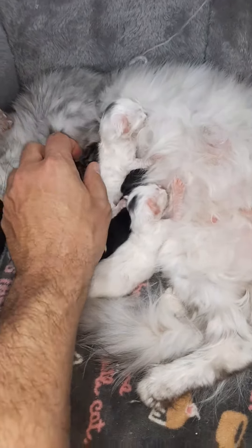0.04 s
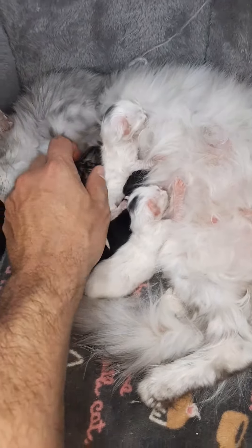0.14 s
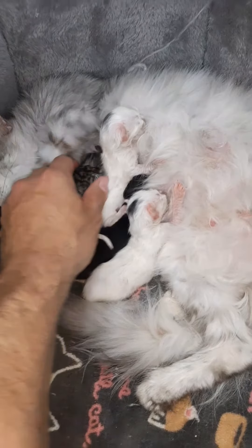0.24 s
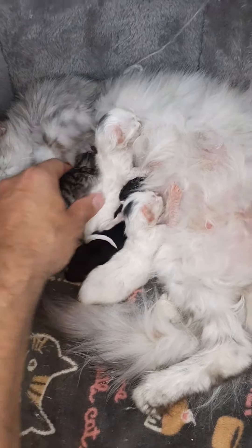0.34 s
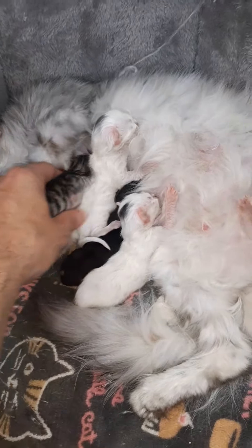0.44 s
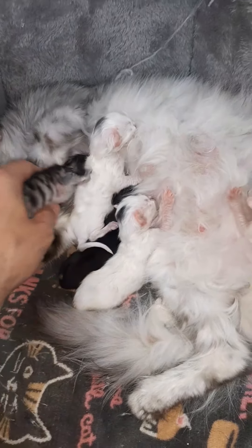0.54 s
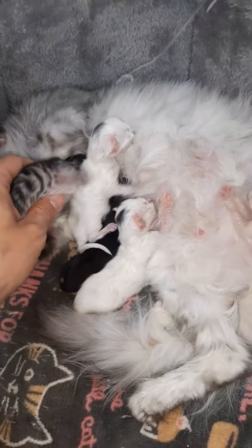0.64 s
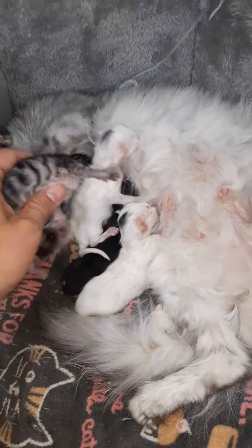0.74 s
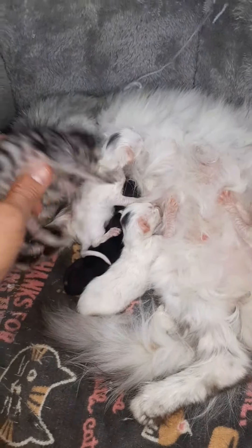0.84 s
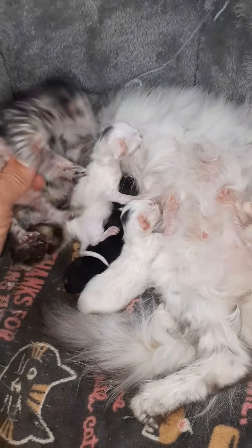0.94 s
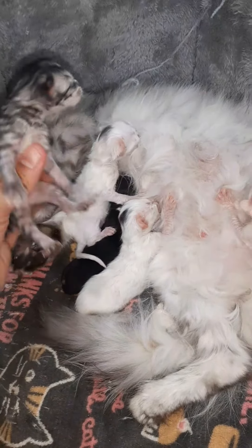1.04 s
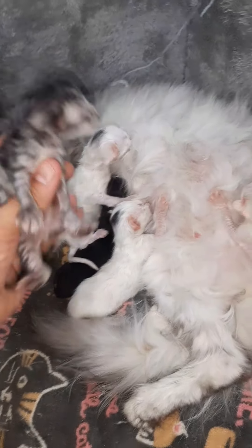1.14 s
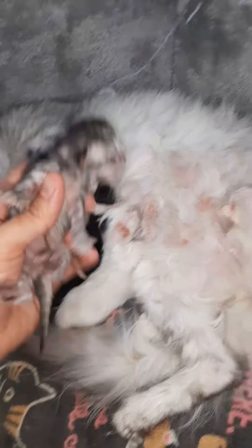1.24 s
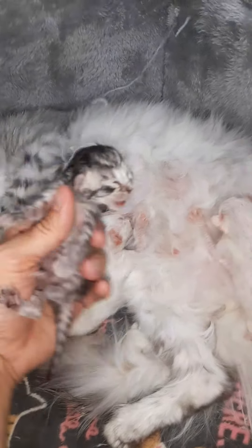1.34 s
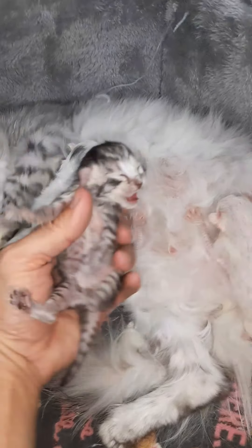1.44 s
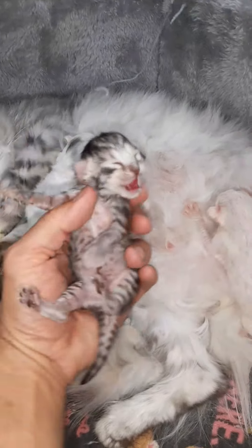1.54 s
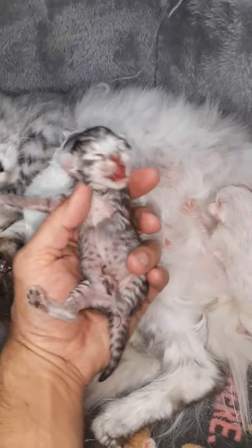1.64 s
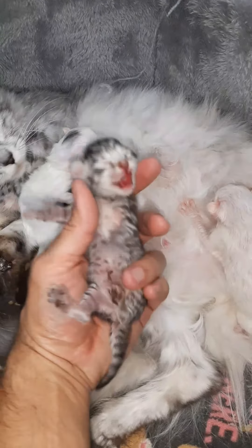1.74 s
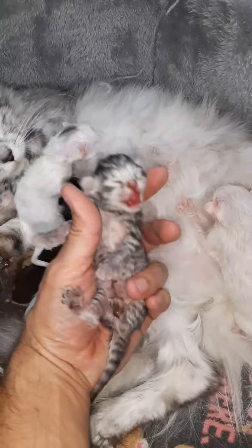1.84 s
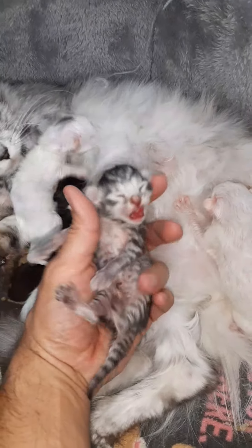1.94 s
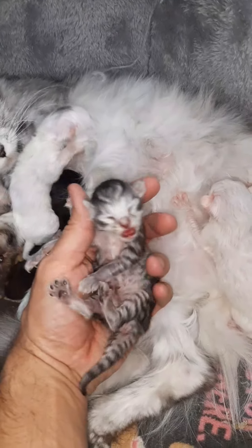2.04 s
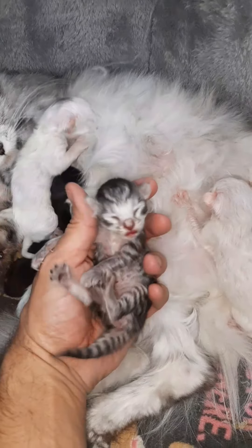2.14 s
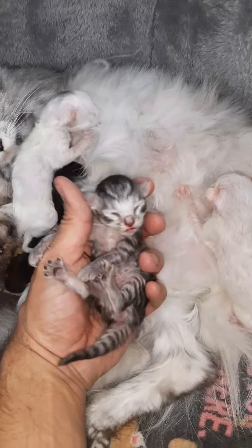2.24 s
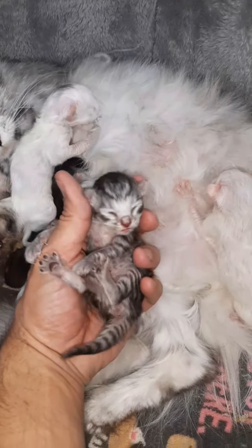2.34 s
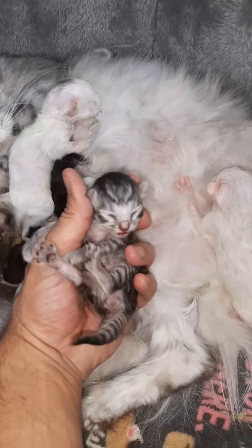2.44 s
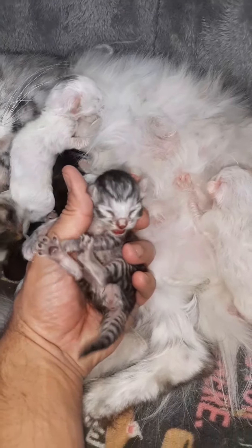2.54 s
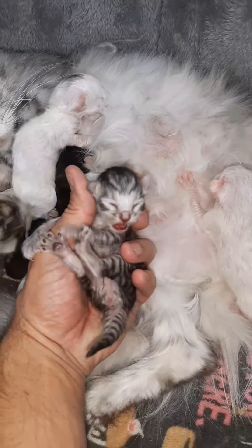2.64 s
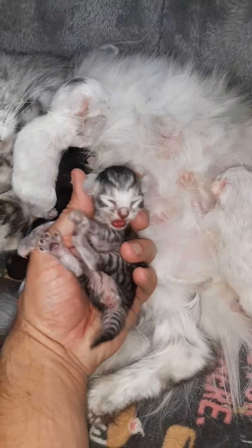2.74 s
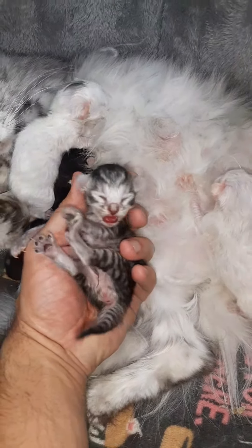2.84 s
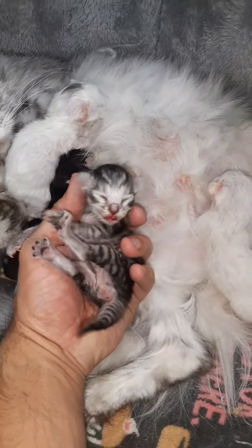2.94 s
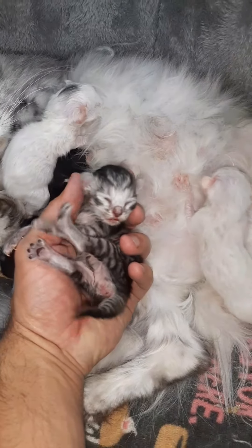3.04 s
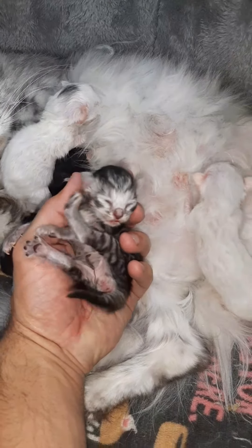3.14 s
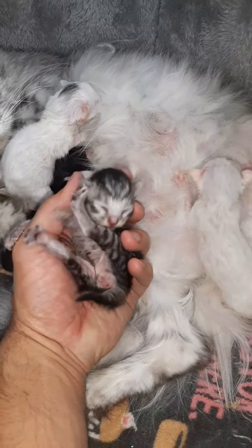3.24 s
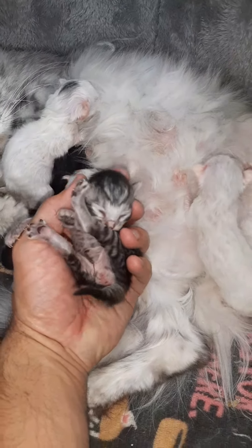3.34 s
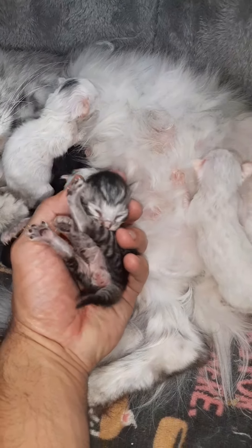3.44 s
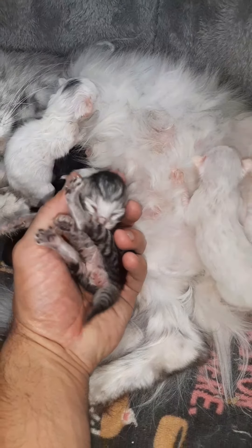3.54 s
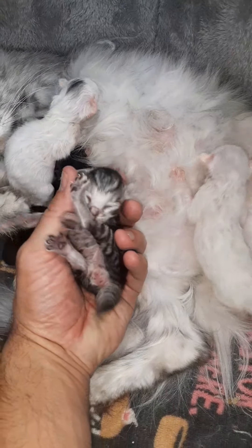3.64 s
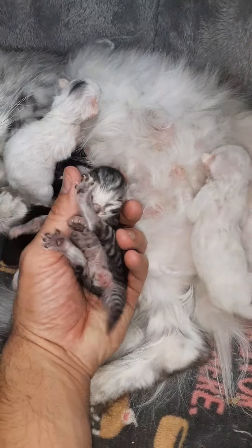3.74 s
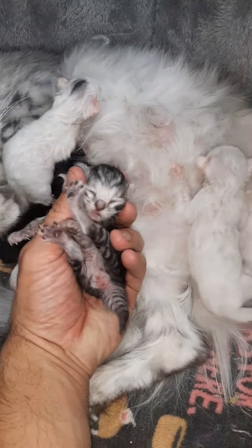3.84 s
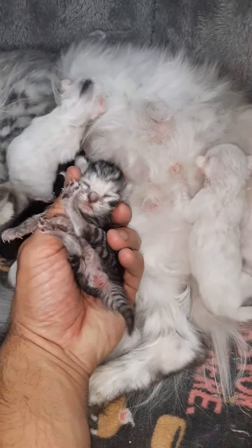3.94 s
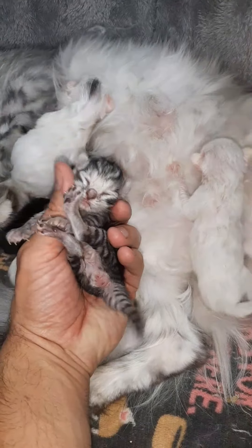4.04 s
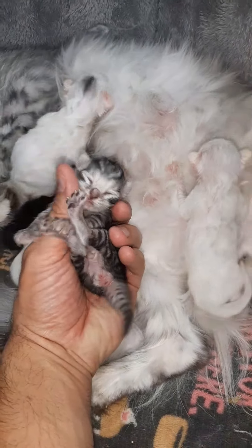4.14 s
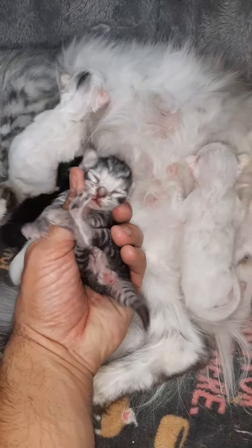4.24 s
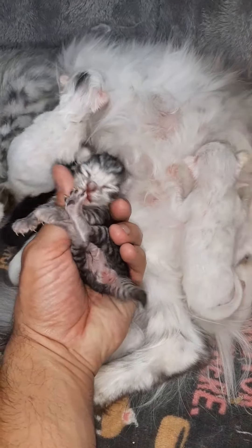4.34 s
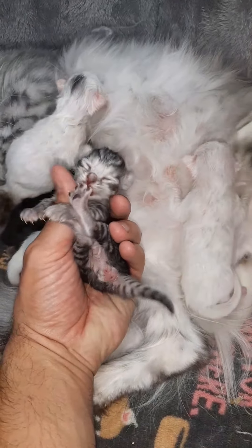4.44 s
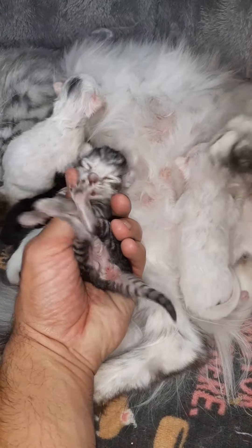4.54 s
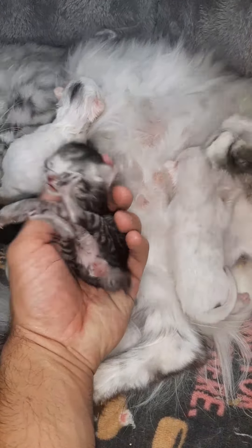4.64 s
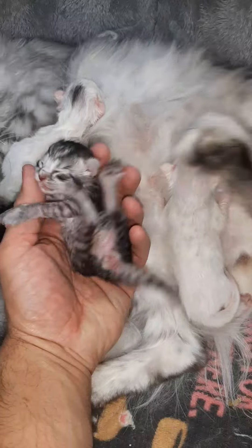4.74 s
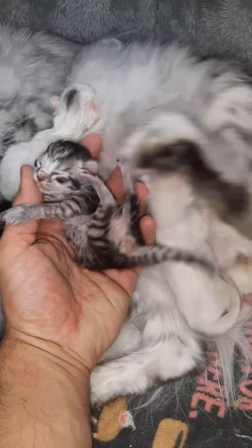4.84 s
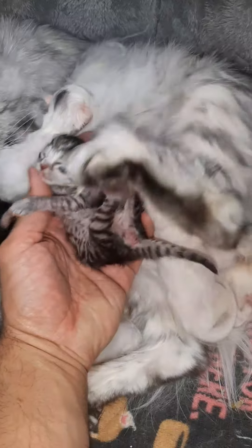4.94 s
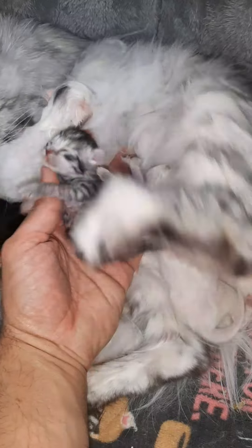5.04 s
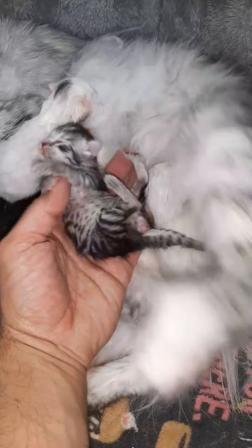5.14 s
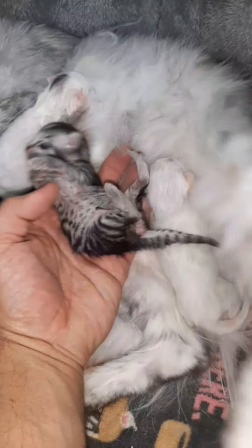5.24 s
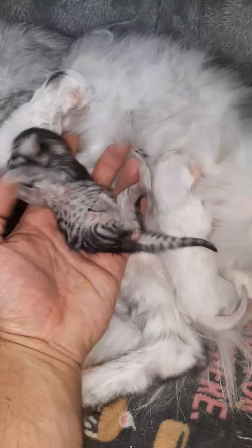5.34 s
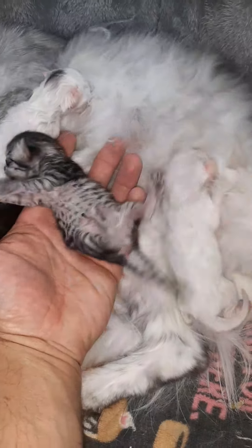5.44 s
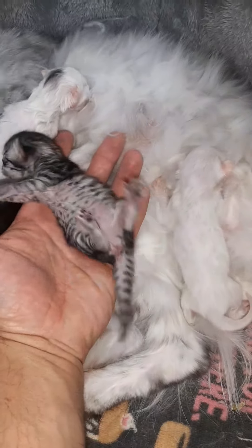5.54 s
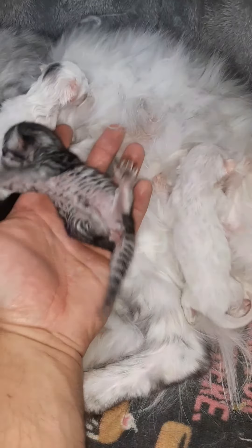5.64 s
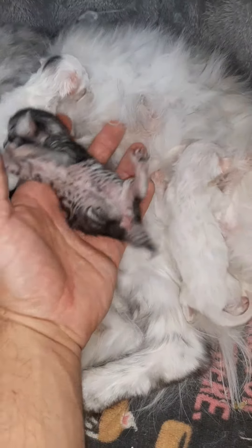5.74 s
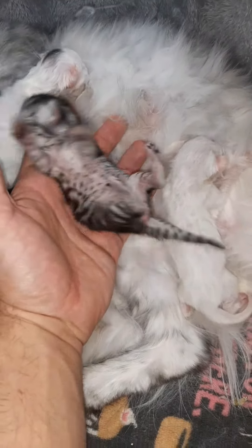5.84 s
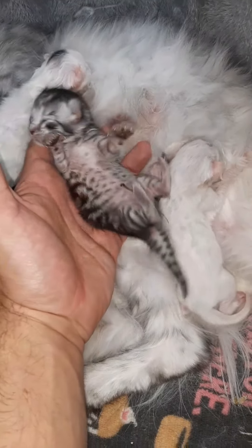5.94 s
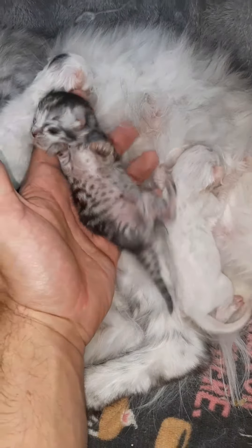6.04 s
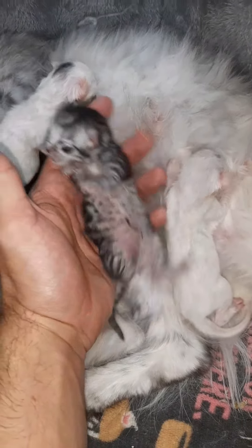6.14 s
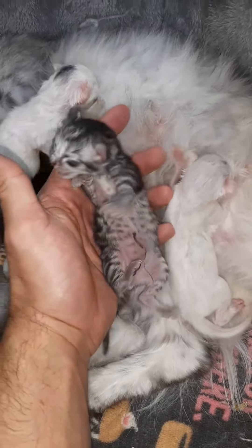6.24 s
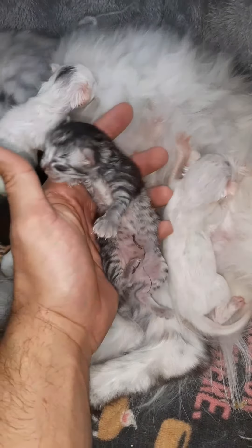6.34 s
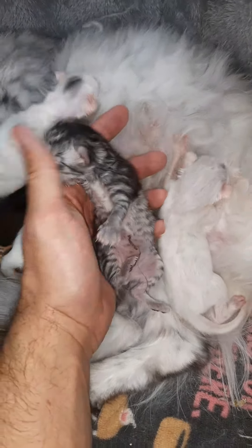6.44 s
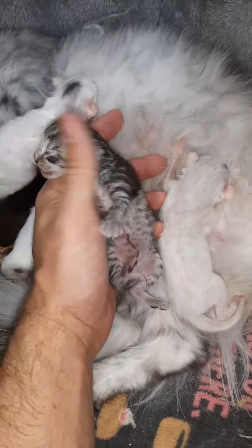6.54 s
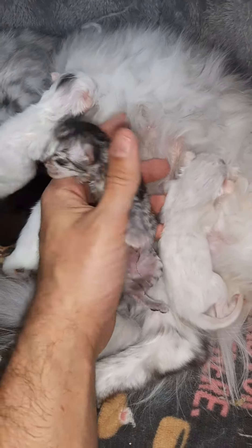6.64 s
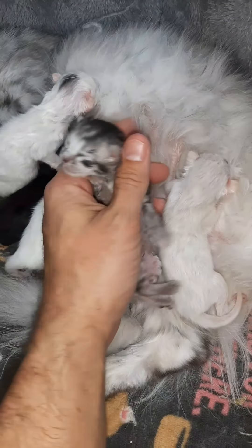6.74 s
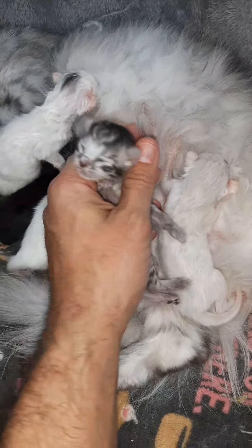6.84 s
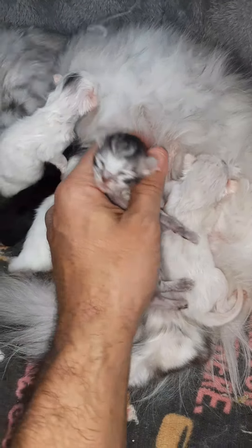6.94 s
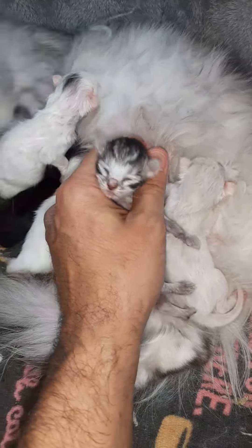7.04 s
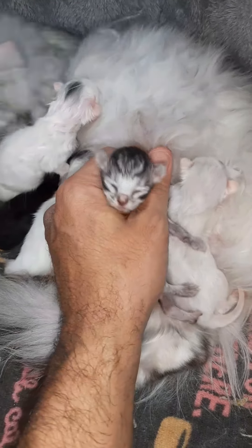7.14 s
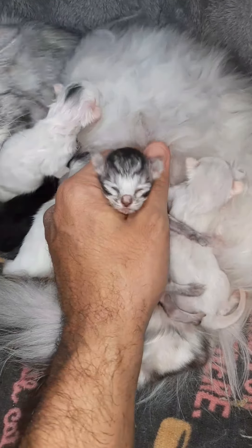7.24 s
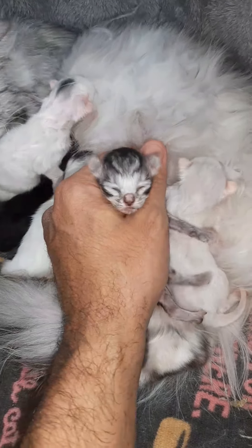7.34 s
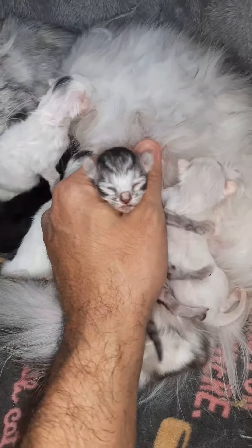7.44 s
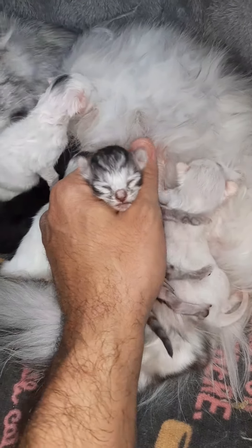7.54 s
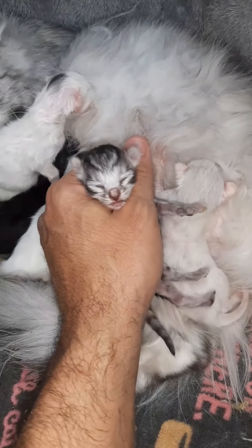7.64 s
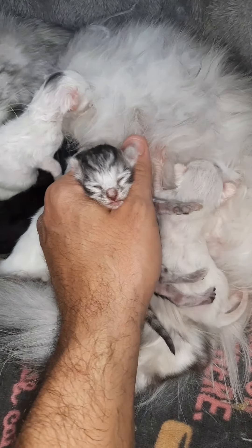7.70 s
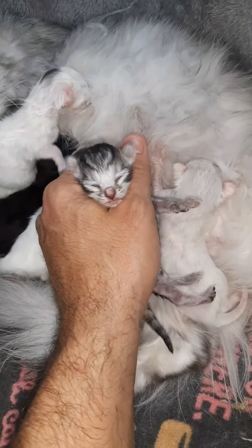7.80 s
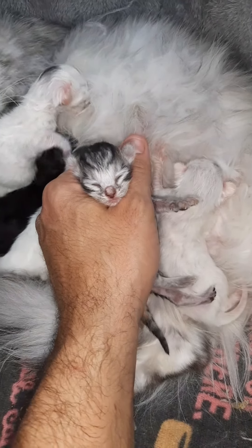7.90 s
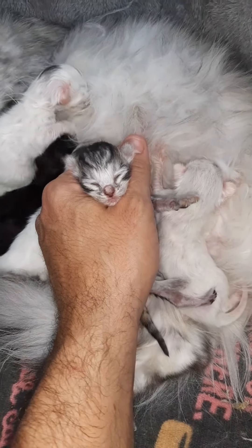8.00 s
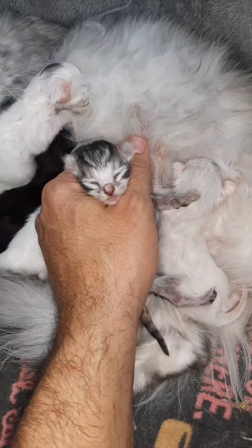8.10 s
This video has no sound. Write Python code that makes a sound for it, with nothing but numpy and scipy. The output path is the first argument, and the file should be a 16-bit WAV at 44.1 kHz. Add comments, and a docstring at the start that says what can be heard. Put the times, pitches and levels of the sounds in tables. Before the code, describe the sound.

A quiet low purr with steady hiss and hum opens the scene, then a tiny kitten squeals, loud and slightly rough. More mews follow with short gaps, some clear, some weaker, the last a broken creak turning into a thin wavering cry. A dull bump with rumble falls after the second mew, and sparse wet ticks click near the mouths. Close stereo phone pickup in a small room with a soft, faint tail.

```python
"""A newborn kitten, lifted in a hand close to a phone, mews seven times: gliding partials, shaken when hoarse.
Its mother purrs breath by breath: paired knocks ring chest and throat while air throbs at the nose.
Wet mouths tick in tiny bursts. One thump rings a few low modes and a dull rumble of noise follows.
The room answers mews, ticks and thump with a soft decaying tail, over a low hum and steady hiss."""
import sys
import numpy as np
from scipy import signal
from scipy.fft import rfft, irfft, next_fast_len
from scipy.io import wavfile
from scipy.ndimage import uniform_filter1d, map_coordinates

SR = 44100
rng = np.random.default_rng(int(sys.argv[2]) if len(sys.argv) > 2 else 0)


def output_pcm(signal):
    """Save a mono or channel-first signal as 16-bit PCM at the path in sys.argv[1].

    Samples are clipped to [-1, 1] before scaling.
    """
    pcm = np.clip(np.atleast_2d(signal).T, -1, 1) * 32767
    wavfile.write(sys.argv[1], SR, np.round(pcm).astype(np.int16))


N = 360297
T = np.arange(N) / SR
SIDE = np.array([[0.5], [-0.5]])  # splits a left-right difference evenly over the ports
TOP_HZ = 15780  # the phone's band limit


def amp(db):
    """dB to gain."""
    return 10 ** (np.asarray(db) / 20)


def unit(x):
    """Scaled to rms 1."""
    return x / np.sqrt(np.mean(x ** 2) + 1e-20)


def along(points, hz):
    """Reads (hz, value) points on a log frequency axis."""
    f, v = np.transpose(points)
    return np.interp(np.log(hz + 1), np.log(f + 1), v, -120, v[-1])


def gain_curve(rows):
    """Gain at each sample from (time_s, level_db) points, nearly silent outside them."""
    return amp(np.interp(T, *np.transpose(rows), -120, -120))


def wobble(rate, count=N):
    """A smooth random curve, rate knots a second."""
    knots = rng.standard_normal(int(count * rate / SR) + 4)
    return map_coordinates(knots, [np.arange(count) * rate / SR])


def filtered(x, response):
    """x through a complex response of frequency."""
    m = next_fast_len(N + SR // 2)
    return irfft(rfft(x, m) * response(np.fft.rfftfreq(m, 1 / SR)), m)[..., :N]


def noise(spectrum, alike):
    """Stereo noise of rms 1; alike is the share of power common to both ports."""
    share = np.clip(alike, 0, 1)
    common = np.sqrt(share) * rng.standard_normal(N)
    white = common + np.sqrt(1 - share) * rng.standard_normal((2, N))
    return unit(filtered(white, lambda hz: amp(along(spectrum, hz))))


def modes(table, f):
    """Causal sum of (centre_hz, width_hz, level_db) resonances with alternating signs."""
    return sum((-1) ** k * amp(db) * 1j * f * width / (centre ** 2 - f * f + 1j * f * width)
               for k, (centre, width, db) in enumerate(table))


# each breath of the purr: start_s, end_s, chest_db, throat_db (relative to chest), rumble_db
BREATH_LEVELS = [(-.1, 0.393, -65, 1.9, -73.5), (0.4, 0.813, -64, -3.5, -76), (0.81, 1.11, -73.5, 9, -88),
                 (1.286, 1.63, -61, -1.5, -70), (1.66, 2.202, -55.5, -6.5, -84),
                 (2.285, 2.773, -59, -6, -75), (2.792, 3.04, -56.5, -12, -78),
                 (3.075, 3.265, -58.5, -11.5, -103), (3.32, 3.65, -64, -8, -71),
                 (3.717, 3.97, -63, -13.5, -77.5), (4.14, 4.262, -75, -28, -87),
                 (4.436, 4.64, -60.5, -8, -74), (4.65, 4.81, -65, -12, -88), (4.9, 5.439, -73, -12, -91.5),
                 (5.518, 5.854, -61, -5, -72), (5.96, 6.462, -59.5, -14, -84), (6.485, 6.734, -59, -3, -68),
                 (6.752, 7.062, -59, -5.5, -77.5), (7.12, 7.3, -57.5, -9, -75),
                 (7.38, 7.975, -57, -10, -85), (8.087, 8.3, -60.5, -10.5, -70.5)]
SWELL_S, FADE_S = 0.1, 0.15


def breathing():
    """Gains of chest, throat and rumble: every breath swells, holds and fades."""
    start, end, chest_db, throat_db, rumble_db = np.transpose(BREATH_LEVELS)
    swell = (T - start[:, None]) / SWELL_S + 0.5
    fade = (end[:, None] - T) / FADE_S + 0.5
    shape = np.clip(np.minimum(swell, fade), 0, 1)
    return amp([chest_db, chest_db + throat_db, rumble_db]) @ shape ** 2


# pace of the purr before its small random drift: time_s, beats_per_s
PURR_PACE = [(0, 29.8), (1.4, 32), (1.9, 26.7), (3, 28.5), (5, 26.5), (6.2, 27.3), (7.2, 28.2),
             (8.17, 29.6)]
# chest resonance breathing out, then in: centre_hz, width_hz, level_db (before the breath mix)
CHEST_MODES = [(114, 62, 0), (86, 34, -2)]
# throat resonances, passed twice: centre_hz, width_hz, level_db (each pass)
THROAT_MODES = [(227.5, 73, -1), (457.3, 570, -10)]
# strong breaths: time_s, half_length_s, air_db, snap_db (drive of each snap), inward (0-1)
NOSE_BREATHS = [(0.392, 0.054, -79.5, -104, 0), (1.476, 0.28, -71, -78.5, 0.57), (2.4, 0.37, -90, -82, 0),
                (4.443, 0.12, -58.5, -89, 0), (5.646, 0.09, -68.5, -87.5, 1),
                (6.009, 0.024, -77, -109, 0.4), (6.605, 0.28, -83, -86, 0.7), (7.171, 0.11, -70, -80, 0.85),
                (8.123, .05, -84.5, -97, 0.01)]
# colour of the air at the nose: hz, level_db (relative density)
NOSE_COLOUR = [(500, -18.5), (1400, 0), (3000, -22), (5500, -0.5), (6800, -22.5), (8500, -1.5),
               (12000, -26), (16000, -5.5)]
REST_DB, REST_THROAT_DB, UNEVEN_DB = -69.5, -85, 2  # chest and throat between breaths; lumpiness


def purr():
    """The larynx shuts and opens once a beat: two uneven knocks ring chest and throat; nose air throbs along."""
    pace = np.interp(T, *np.transpose(PURR_PACE))
    cycle = np.cumsum(pace * (1 + 0.011 * wobble(7))) / SR
    beats = np.flatnonzero(np.diff(np.floor(2 * cycle)))
    draw = rng.standard_normal((len(beats), 2))
    shuts = np.arange(len(beats)) % 2
    jitter = (0.0012 * SR * draw[:, 1]).astype(int)
    where = np.clip(beats + jitter, 0, N - 1)
    knocks = np.bincount(where, np.where(shuts, 1, 0.5) * amp(2.5 * draw[:, 0]), N)
    grain = rng.standard_normal(N) + 0.35 * rng.standard_normal((2, N))
    drive = unit(knocks) + 0.55 * grain

    bell = np.array([np.exp(-((T - s) / half) ** 2) for s, half, *_ in NOSE_BREATHS])
    _, _, air_db, snap_db, inward = np.transpose(NOSE_BREATHS)
    inward = np.clip(inward @ bell, 0, 1)

    def ports(f, db, rad):
        """Soft tissue dulls the knocks; the ports hear them at opposite level and phase offsets."""
        tissue = (1j * f / (62 + 1j * f)) ** 2 / (1 + 1j * f / 620) ** 4
        return amp([[db], [-db]]) * np.exp(1j * np.array([[-rad], [rad]])) * tissue

    out, into = (unit(filtered(drive, lambda f: modes([mode], f) * ports(f, 3.6, 0.22))) * amp(mode[2])
                 for mode in CHEST_MODES)
    throat = unit(filtered(drive, lambda f: modes(THROAT_MODES, f) ** 2 * ports(f, 1.6, 0.06)))
    lumps = amp(UNEVEN_DB * np.array([wobble(14), wobble(15), wobble(8)]))
    chest_gain, throat_gain, _ = breathing() * lumps
    chest = (1 - 0.81 * inward) * out + 2.3 * inward * into
    body = (chest_gain + amp(REST_DB)) * chest + (throat_gain + amp(REST_THROAT_DB)) * throat

    shutting = np.bincount(where, shuts * amp(draw[:, 0]), N)
    snap = filtered(shutting, lambda f: modes([(1100, 410, 0)], f) ** 2)
    snap = unit(snap)
    throb = 0.62 + (0.5 + 0.5 * np.cos(2 * np.pi * cycle)) ** 2.2
    air = throb * noise(NOSE_COLOUR, alike=0.4)
    return body + amp(snap_db) @ bell * snap + amp(air_db) @ bell * air


# rumble rolling on after the thump: time_s, level_db
RUMBLE_LEVEL = [(2.96, -88), (2.98, -52), (3.14, -70), (3.43, -60), (3.57, -61.5), (3.71, -66.5),
                (3.87, -73.5), (4.0, -82.5)]
# colour of the rumble: hz, level_db (relative density)
RUMBLE_COLOUR = [(180, -27.5), (300, -7.5), (328, 1), (373, 0.5), (668, -11.5), (785, -31), (1000, -17.5),
                 (1300, -21), (2200, -120)]
# colour of the hum: hz, level_db (relative density)
HUM_COLOUR = [(25, -23), (40, -8.5), (70, -5), (160, 1), (260, -10.5), (400, -27.5), (600, -120)]
# colour of the hiss: hz, level_db (relative density)
HISS_COLOUR = [(240, -25), (400, -2), (474, -8.5), (765, -11), (1040, -9.5), (3120, -17.5), (3930, -19),
               (8630, -23.5), (15000, -16), (16000, -26.5)]


def background():
    """Dull noise swells with each breath and rolls on after the thump, over low noise hum and steady hiss."""
    level = breathing()[2] + gain_curve(RUMBLE_LEVEL)
    rumble = level * amp(1.2 * wobble(12)) * noise(RUMBLE_COLOUR, alike=0.5)
    hum = amp([[-67], [-73]]) * noise(HUM_COLOUR, alike=1.0)
    hiss = amp(-77.0) * noise(HISS_COLOUR, alike=0.031)
    return rumble + hum + hiss


# wet clicks: start_s, level_db (before a common trim), centre_hz, left_right_db
WET_TICKS = [(1.149, -44.5, 3340, 11.5), (4.1277, -45, 6730, 17), (4.1318, -44.5, 5920, 5),
             (4.286, -59.5, 7460, -9), (5.217, -67, 10960, 8), (6.0003, -59.5, 5950, 0.5),
             (7.5875, -40.5, 8280, 7.5), (7.593, -58, 11040, -6), (7.69, -44, 7360, 9),
             (7.876, -48.5, 2940, -4)]


def ticks():
    """Tiny wet clicks: a burst of a few cycles wavering around one pitch."""
    out, t = np.zeros((2, N + SR)), T[:300]
    for start_s, level_db, centre_hz, left_right_db in WET_TICKS:
        turn = 2 * np.pi * centre_hz * np.cumsum(1 + 0.45 * wobble(5000, count=len(t))) / SR
        envelope = amp(-60 * t / 0.011) * (1 - np.exp(-t / 0.00023))  # fall to -60 dB, rise; both in s
        gain = amp(level_db - 3.5 + SIDE * left_right_db)
        out[:, round(start_s * SR):][:, :len(t)] += gain * envelope * np.sin(turn)
    return out[:, :N]


# decay of the room: hz, t60_s
ROOM_DECAY = [(200, 0.37), (1500, 0.71), (3500, 0.75), (6500, 0.65), (16000, 0.53)]


def room(x):
    """A delayed noise tail, each frequency dying at its own speed."""
    hz, t, z = signal.stft(rng.standard_normal((2, SR)), SR, nperseg=256)
    t60 = np.interp(hz, *np.transpose(ROOM_DECAY))[:, None]
    tail = signal.istft(z * amp(-60 * t / t60), SR, nperseg=256)[1]
    tail = tail / np.linalg.norm(tail[0])
    delayed = np.pad(x, (500, 0))[None]  # samples
    return signal.fftconvolve(delayed, tail, axes=1)[:, :N]


# one table a mew, the last mew in two:
# time_s, pitch_hz, fundamental_db, overtones_db, mouth_hz (resonance), mouth_lift_db
MEW_GLIDES = [
    [(1.241, 1196, -78, -84, 3700, 9.5), (1.273, 1426, -71, -72.5, 4230, 10),
     (1.293, 1754, -64.5, -75, 5520, 24.5), (1.343, 1915, -49.5, -43.5, 5600, 5),
     (1.395, 1810, -46.5, -38.5, 5790, 20.5), (1.43, 1911, -49, -42, 5500, 11.5),
     (1.485, 2063, -52, -43, 4100, 12.5), (1.6, 1918, -49.5, -49, 3900, 12.5),
     (1.7, 1748, -48.5, -47, 3900, 2), (1.846, 1864, -43.5, -42.5, 5800, 3.5),
     (1.999, 1557, -49.5, -53, 5480, 15.5), (2.053, 1511, -51, -53.5, 5420, 14.5),
     (2.157, 1300, -60.5, -74.5, 4810, 27.5), (2.2, 945, -71, -67.5, 4400, 13.5),
     (2.215, 928, -67, -62, 4900, 14)],
    [(2.49, 1013, -72, -76.5, 5100, 7), (2.552, 1145, -57.5, -72.5, 5100, 19.5),
     (2.58, 1386, -54.5, -57.5, 5570, 12.5), (2.65, 1738, -43.5, -49.5, 6030, 17.5),
     (2.702, 1594, -45.5, -47, 6450, 8.5), (2.74, 1739, -46, -50, 7500, 17),
     (2.832, 1672, -44, -48.5, 6370, 7.5), (2.887, 1532, -51, -52, 6000, 13.5),
     (2.927, 1645, -53.5, -57.5, 5200, 18), (2.975, 1485, -56.5, -60.5, 4640, 13.5),
     (2.999, 1300, -57, -60, 5570, 23)],
    [(3.32, 931, -71, -78, 4200, 15), (3.362, 1291, -60, -71, 4660, 20.5),
     (3.384, 1263, -61, -72, 4700, 30.5), (3.47, 1512, -55.5, -59, 4480, 24),
     (3.522, 1617, -48.5, -60.5, 4370, 22.5), (3.584, 1415, -55.5, -57.5, 4320, 18),
     (3.618, 1210, -61.5, -63.5, 4000, 15), (3.65, 1227, -57.5, -64.5, 3200, 8.5),
     (3.69, 1008, -70.5, -68, 4300, -4)],
    [(4.24, 1047, -74, -78, 2560, 22), (4.262, 1329, -63.5, -86, 3250, 28.5),
     (4.306, 1353, -60, -69.5, 4300, 10), (4.388, 1758, -51, -62.5, 4470, 28.5),
     (4.498, 1832, -53, -52.5, 3840, 10.5), (4.645, 1635, -45, -60.5, 4100, 25),
     (4.689, 1668, -52, -56.5, 4030, 15.5), (4.833, 1314, -63.5, -68.5, 2950, 9),
     (4.903, 1470, -61, -69, 3400, 12), (4.935, 1248, -68, -76.5, 3000, 11.5),
     (4.962, 836, -81, -76.5, 3230, 16.5), (4.993, 1053, -67.5, -74, 3500, 8.5),
     (5.025, 1131, -65, -75, 2600, 19.5)],
    [(5.396, 1223, -90, -96.5, 3400, 18), (5.43, 1267, -68, -93, 3440, 30),
     (5.464, 1163, -65.5, -91, 2900, 27.5), (5.505, 1624, -56, -95.5, 3860, 11),
     (5.607, 1713, -53, -72, 6080, 0), (5.747, 1332, -60.5, -81, 2900, 8.5),
     (5.783, 1167, -69, -87.5, 2600, 9), (5.829, 950, -88, -89.5, 2660, -7)],
    [(6.15, 1007, -75, -89, 2592, 19.5), (6.185, 1327, -67.5, -87, 3990, 29.5),
     (6.228, 1337, -64, -83, 3360, 27), (6.27, 1743, -46.5, -68.5, 3360, 14),
     (6.33, 1671, -47, -48.5, 3320, 6.5), (6.376, 1803, -48.5, -55, 3600, 25.5),
     (6.423, 1596, -47.5, -43, 2870, 7), (6.5, 1705, -47.5, -42, 3070, 9.5),
     (6.569, 1805, -47.5, -52.5, 3390, 31), (6.663, 1669, -48.5, -50, 3030, 16),
     (6.815, 1237, -65, -65, 3310, 10.5), (6.874, 908, -66.5, -69.5, 3100, 13.5)],
    [(7.355, 678, -94, -81, 3920, 3.5), (7.369, 677, -74, -74, 4306, 12),
     (7.435, 717, -72, -71.5, 2600, 16.5), (7.463, 1145, -78, -67, 3200, -11)],
    [(7.469, 1107, -53, -61, 3620, 10), (7.481, 1090, -64, -67.5, 3260, 8),
     (7.5, 1540, -53.5, -64, 4140, 11), (7.6, 1517, -51.5, -59.5, 4500, 8),
     (7.687, 1488, -66.5, -68, 5000, 7), (7.746, 1265, -64.5, -62, 4220, 12.5),
     (7.786, 1526, -56.5, -77, 4830, 25), (7.81, 1297, -65.5, -74.5, 4540, 19),
     (7.878, 690, -71, -61.5, 4020, -1)],
]
# each of those: left_lead_ms, top_fall_db_per_khz, hollow_hz (in the treble), hollow_depth_db
MEW_PLACES = [(.16, 1.36, 28000, 6.5), (0.15, .4, 10400, 0.5), (0.085, -0.44, 11200, 6.5),
              (0.15, 0.73, 7900, 6), (.16, 0.5, 7450, 5), (0.18, 1.16, 11400, 8), (0.14, 28, 8500, 14),
              (.15, 6.5, 8500, 11)]
# heights at which the phone shades its ports unevenly: hz
SHADE_HEIGHTS = [1700, 4200, 6600, 11000]
# each of those: left_right_db at the four heights
MEW_SHADES = [(-2, 3.7, 10, 1), (-0.5, -9, 14.5, 0.5), (0.3, -2.5, -7.5, 15), (1.5, 0, 12.5, 5.5),
              (7, 2.5, -3.5, -2.1), (3.8, 1.9, 5.5, 4), (12.5, -4.5, .1, -5), (12.5, 0, 2, 1)]
# each of those: hoarseness_db at full voice (before it grows with the partials)
MEW_HOARSENESS = [-25, -34, -22, -24, -22, -40, -11, -21]
# every second cycle is weaker: time_s, depth_db
CYCLE_DOUBLING = [(1.2, -10), (1.3, 2.5), (1.35, -6.5), (1.37, -36.5), (1.41, -27.5), (1.43, -54)]
# the voice cracks under effort: start_s, end_s, extra_hoarseness_db (before it grows with the partials)
VOICE_STRAIN = [(1.26, 1.33, 1), (1.345, 1.56, -13), (3.3, 3.4, -4), (4.37, 4.46, -12), (6.41, 6.55, -12),
                (7.42, 7.5, -6)]
# quick bends of the voice: time_s, half_length_s, bend (share of the pitch)
VOICE_CATCHES = [(2.676, 0.01, 0.039), (2.8, 0.013, -0.039), (3.472, 0.027, 0.028), (7.541, .012, -0.041),
                 (7.646, 0.022, -0.022)]
# colour of the partials: hz, level_db
MOUTH_COLOUR = [(500, 0.2), (7000, 1.13), (9800, 7.5), (12500, -1), (15500, 2.1)]
# colour of the hoarse air: hz, level_db (relative density)
RASP_COLOUR = [(700, -9.5), (2000, -7.5), (5000, -15.5), (9000, -0.5), (16000, -5.5)]
RING_HZ, HOLLOW_HZ = 703.3, 1300  # half widths of mouth resonance and hollow
FALL_DB, TOP_RANGE_HZ = 2, 7500  # fall a partial up to the sixth; where the top range starts
WEAK_HOARSE, MOST_HOARSE_DB = 1.2, -2  # dB of hoarseness per dB under full voice; ceiling before strain
STRAIN_LIFT_DB, FULL_STRAIN = 6, 0.3  # cracking brightens upper partials; strain gain where complete


def mews():
    """Partials on a gliding pitch; hoarseness shakes them, which smears them, and adds a little air."""
    out, rasp = np.zeros((2, N)), noise(RASP_COLOUR, alike=0.9)
    halves = gain_curve(CYCLE_DOUBLING)
    strain = sum(amp(db) * np.clip(np.minimum(T - start, end - T) / 0.03, 0, 1)
                 for start, end, db in VOICE_STRAIN)
    for rows, place, shade_db, hoarse_db in zip(MEW_GLIDES, MEW_PLACES, MEW_SHADES, MEW_HOARSENESS):
        lead_ms, top_fall_db, hollow_hz, hollow_db = place
        s, *columns = np.transpose(rows)
        span = slice(round(s[0] * SR), round(s[-1] * SR))
        t, effort = T[span], strain[span]
        count = len(t)
        glide, voice_db, over_db, mouth_hz, lift_db = (np.interp(t, s, c) for c in columns)

        tremor = 0.005 * wobble(26, count) + 0.004 * wobble(160, count)
        tremor = tremor + sum(bend * np.exp(-((t - at) / half) ** 2) for at, half, bend in VOICE_CATCHES)
        hz = uniform_filter1d(glide, size=650, mode="nearest") * (1 + tremor)
        turn = 2 * np.pi * (np.cumsum(hz) / SR + SIDE * hz * lead_ms / 1000)
        edge = np.minimum(1, np.minimum(t - s[0], s[-1] - t) / 0.016)

        weak_db = WEAK_HOARSE * (voice_db.max() - voice_db)  # a weak voice is hoarser
        hoarse = amp(np.minimum(hoarse_db + weak_db, MOST_HOARSE_DB)) + effort
        power = 0
        for k in range(1, 17):
            partial_hz = k * hz
            if k == 1:
                db = voice_db
            else:
                ring_db = lift_db / (1 + ((partial_hz - mouth_hz) / RING_HZ) ** 2)
                ring_db = ring_db - hollow_db / (1 + ((partial_hz - hollow_hz) / HOLLOW_HZ) ** 2)
                fall_db = FALL_DB * (min(k, 6) - 2)
                fall_db = fall_db + top_fall_db * np.maximum(partial_hz - TOP_RANGE_HZ, 0) / 1000
                db = over_db + ring_db - fall_db
            db = db + along(MOUTH_COLOUR, partial_hz) + (1.6 + 0.27 * k) * wobble(45, count)
            db = db + STRAIN_LIFT_DB * np.minimum(effort / FULL_STRAIN, 1) * (k > 5)
            lean_db = SIDE * (np.interp(partial_hz, SHADE_HEIGHTS, shade_db) + 3 * wobble(9, count))
            doubling = halves[span] * (k > 1) * np.cos(turn / 2)
            shake = 1 + doubling + hoarse * (0.61 + 0.09 * k) * wobble(800, count)
            tone = np.sqrt(2) * np.sin(k * turn + k * k) * (partial_hz < TOP_HZ)
            out[:, span] += edge * shake * amp(db + lean_db) * tone
            power = power + amp(2 * db)
        out[:, span] += edge ** 2 * amp(-17.0) * hoarse * np.sqrt(power) * rasp[:, span]
    return out


# what the thump rings: mode_hz, level_db (relative), t60_s
THUMP_MODES = [(149, -1.5, 0.025), (377, -7, 0.056), (575, -17.5, 0.051), (1240, 1, 0.0032)]
THUMP_S, THUMP_DB, THUMP_RISE_S = 2.961, -29.5, 0.0008


def thump():
    """One soft blow that rings a few low modes."""
    t = np.maximum(T - THUMP_S, 0)
    ring = sum(amp(db - 60 * t / t60) * -np.sin(2 * np.pi * hz * t) for hz, db, t60 in THUMP_MODES)
    return amp(THUMP_DB) * (1 - np.exp(-t / THUMP_RISE_S)) * ring * amp([[1.2], [-1.2]])


def scene():
    """All sources; mews, ticks and thump also sound through the room."""
    near = mews() + ticks() + thump()
    return near + amp(-14.5) * room(near[0]) + purr() + background()


LOW_HZ = 28.7  # the microphone loses the deepest bass


def record(dry):
    """The phone keeps nothing above its band limit and little of the deepest bass."""
    return filtered(dry, lambda hz: (hz < TOP_HZ) * (1j * hz / (LOW_HZ + 1j * hz)) ** 2)


dry = scene()
out = record(dry)
output_pcm(out)
```